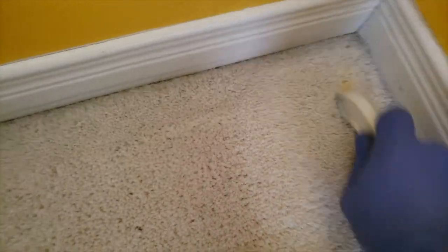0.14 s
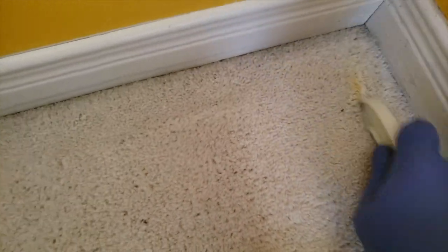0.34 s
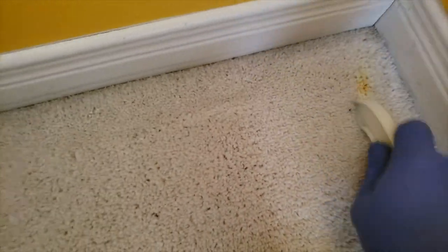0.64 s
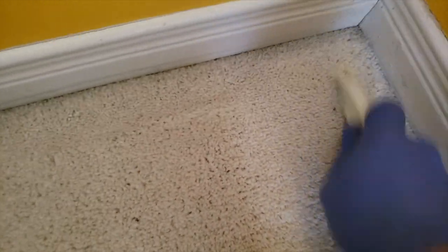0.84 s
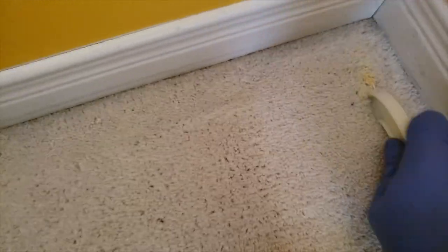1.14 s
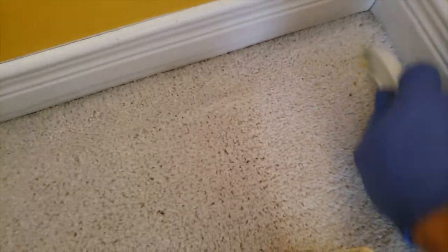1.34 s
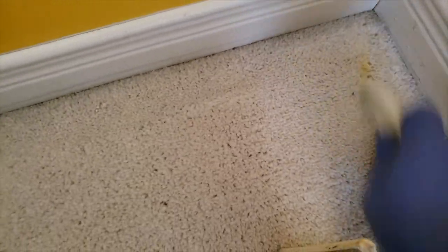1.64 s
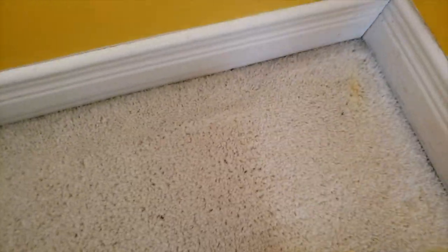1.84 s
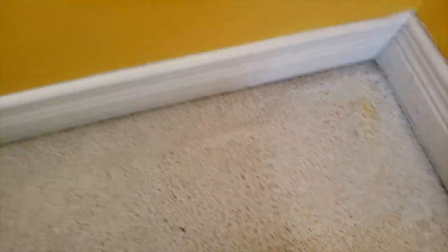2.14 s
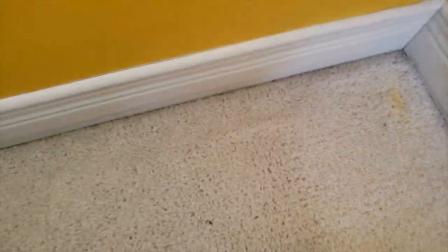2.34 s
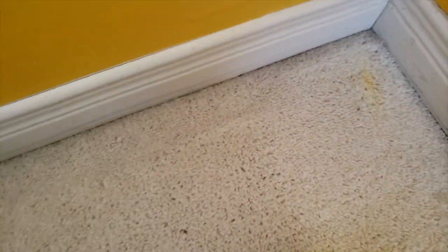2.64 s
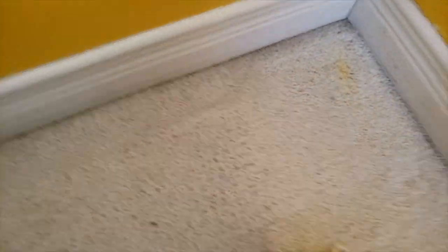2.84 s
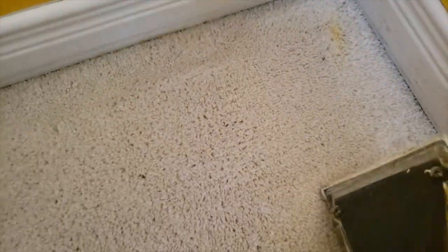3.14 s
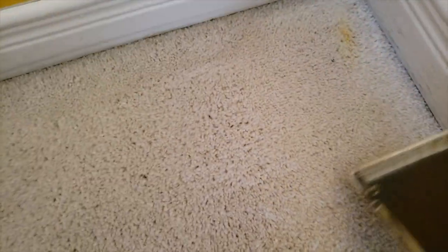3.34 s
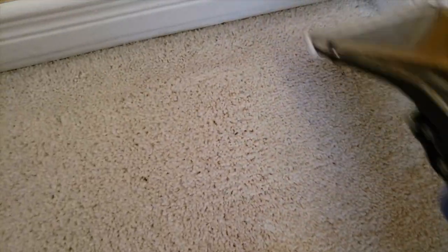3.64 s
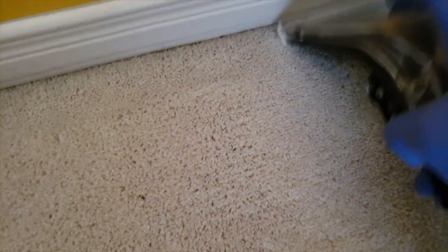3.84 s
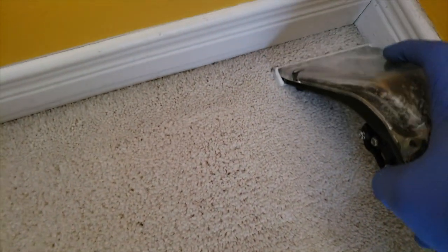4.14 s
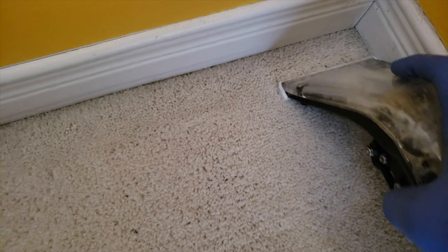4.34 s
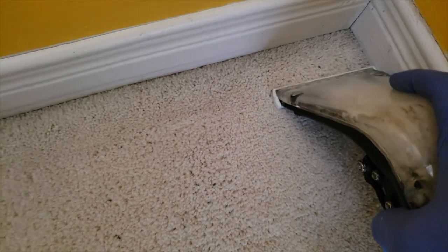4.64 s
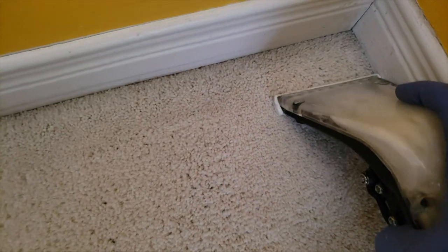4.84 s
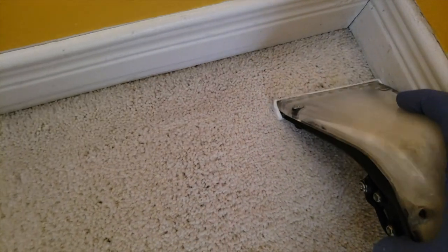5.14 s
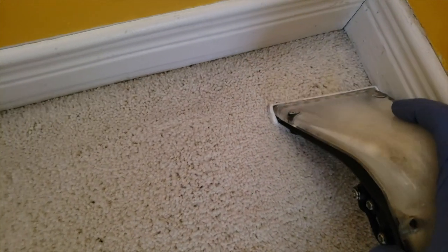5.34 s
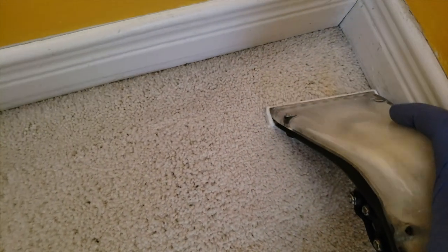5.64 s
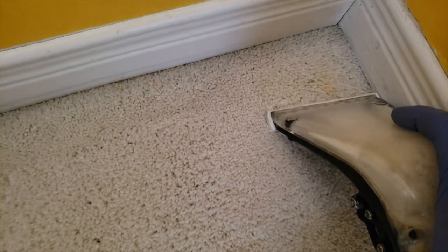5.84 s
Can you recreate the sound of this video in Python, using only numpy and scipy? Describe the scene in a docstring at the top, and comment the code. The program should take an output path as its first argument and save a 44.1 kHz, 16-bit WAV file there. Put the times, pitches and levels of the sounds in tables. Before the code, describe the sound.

Close hissing suction and steady machine hum, broken by a knock and thump as the nozzle seals on carpet, dips and grows again.

```python
"""A close suction tool hisses in open air over the room hum of a carpet extractor's motor and blower.
Turbulence at the slot excites the nozzle's resonances; the hiss swells with each stroke of a scrubbing
hand and changes colour as the tool is turned and lifted. Swung over, the tool knocks on the skirting
board and seals on the carpet with a thump. The hiss drops at the seal, then the whole sound gradually
swells back."""
import sys
import numpy as np
from scipy import signal
from scipy.fft import rfft, irfft
from scipy.io import wavfile
from scipy.ndimage import uniform_filter1d

SR = 44100
rng = np.random.default_rng(int(sys.argv[2]) if len(sys.argv) > 2 else 0)


def to_wav(s):
    """Save 16-bit WAV."""
    ch = np.atleast_2d(s).T  # columns
    pcm = np.round(np.clip(ch, -1, 1) * 32767)  # PCM
    wavfile.write(sys.argv[1], SR, pcm.astype(np.int16))


N = 264600
TIME = np.arange(N) / SR
WINDOW = dict(nperseg=512, noverlap=384)
HZ, FRAMES, _ = signal.stft(np.zeros(N), SR, **WINDOW)
SEAL_S = 3.853  # the slot meets the carpet

# The whole sound swells back after the seal. Each row: time in seconds, relative level in dB.
LEVEL_RECOVERY = [(3.9, -6.3), (4.3, -5.5), (4.53, -3.1), (4.9, -2.5), (5.15, 1.4), (5.4, 1.7), (5.75, 3.5),
                  (6, 3.5)]


def amp(db):
    """Amplitude ratio of a level in decibels."""
    return 10 ** (np.asarray(db) / 20)


def unit_rms(x):
    """Normalisation to rms 1."""
    return x / np.sqrt(np.mean(x ** 2) + 1e-20)


def follow(rows, t):
    """Linear interpolation of each column at the times t."""
    s, *columns = np.transpose(rows)
    return np.array([np.interp(t, s, c) for c in columns])


def colour(rows, hz):
    """Interpolation of each column over log frequency."""
    f, *columns = np.transpose(rows)
    return np.array([np.interp(np.log(hz + 1), np.log(f), c) for c in columns])


def drift(t, rate_hz):
    """Superposed slow sines of random phase, up to rate_hz: a wander of rms 1."""
    rates = rate_hz * np.geomspace(.1, 1, 20)[:, None]
    return unit_rms(np.sin(2 * np.pi * (rates * t + rng.random(rates.shape))).sum(0))


def patches(shape, bins, frames):
    """Noise smoothed over frequency and time into blotches of rms 1."""
    field = uniform_filter1d(rng.standard_normal(shape), size=bins, axis=-2)
    return unit_rms(uniform_filter1d(field, size=frames, axis=-1))


def white():
    """Short-time spectra of white noise."""
    return signal.stft(rng.standard_normal(N) * np.sqrt(SR / 2), SR, **WINDOW)[2]


def noise(spectrum):
    """Stationary noise from rows of frequency in Hz and spectral density in dB per Hz."""
    gain = amp(colour(spectrum, np.fft.rfftfreq(N, 1 / SR))[0])
    return irfft(rfft(rng.standard_normal(N)) * gain, N) * np.sqrt(SR / 2)


def tone(turns):
    """A sinusoid of rms 1 and random phase."""
    return np.sqrt(2) * np.sin(2 * np.pi * (turns + rng.random()))


def bump(centre_hz, width_hz):
    """A Gaussian of height 1 over frequency."""
    return np.exp(-((HZ[:, None] - centre_hz) / width_hz) ** 2)


def swell(s, half_s):
    """A Gaussian of height 1 over time."""
    return np.exp(-((FRAMES - s) / half_s) ** 2)


def burst(start_s, end_s, db, rise_db_per_s, fall_db_per_s):
    """An envelope: exponential growth, a hold from start to end, exponential decay."""
    early_s, late_s = np.maximum(start_s - TIME, 0), np.maximum(TIME - end_s, 0)
    return amp(db - rise_db_per_s * early_s - fall_db_per_s * late_s)


def nozzle(air, modes, flow_db, wander_db, patchy_db, flutter_db, alike, low_hz, near_hz,
           rings_db, extra_db):
    """Turbulence radiates broad noise and excites resonances, partly coherent at two microphones."""
    hz = HZ[:, None]
    power = amp(colour(air, hz)) ** 2 * np.ones(len(FRAMES))
    # long waves reach both microphones alike
    cross_power = np.sqrt(power.prod(0)) / (1 + (hz / near_hz) ** 4) + 0j
    for centre, width, left_db, right_db, lead in modes:
        detune = (hz - centre * (1 + 0.008 * drift(FRAMES, 9))) / width
        ring = amp(rings_db + wander_db * drift(FRAMES, 16)) / (1 + 2 * detune ** 2)
        power += (amp([left_db, right_db])[:, None, None] * ring) ** 2
        cross_power += alike * amp(left_db) * amp(right_db) * ring ** 2 * np.exp(1j * lead)
    coherence = cross_power / np.sqrt(power.prod(0))
    left = white()
    right = coherence.conj() * left + np.sqrt(np.maximum(1 - abs(coherence) ** 2, 0)) * white()
    # cavity, slot and jet rule the low, middle and high bands
    shares = colour([(3300, 1, 0, 0), (4300, 0, 1, 0), (8000, 0, 1, 0), (10500, 0, 0, 1)], HZ)
    eddies = patches(left.shape, bins=9, frames=16)
    level_db = shares.T @ flow_db + extra_db + patchy_db * eddies + flutter_db * drift(FRAMES, 55)
    low_cut = hz ** 3 / (hz ** 3 + low_hz ** 3)
    spectra = np.array([left, right]) * np.sqrt(power) * amp(level_db) * low_cut
    return signal.istft(spectra, SR, **WINDOW)[1][:, :N]


def board_echo(near, strength, wobble):
    """Comb filtering, in dB: the skirting board's echo interferes, sooner as the tool nears it."""
    far_s, near_s = 0.001223, 0.00037
    delay = near_s + (far_s - near_s) * np.exp(-10.8 * near)
    delay = delay * (1 + wobble * np.array([drift(FRAMES, 2.8), drift(FRAMES, 2.8)]))  # the hand moves
    ripple = np.cos(2 * np.pi * HZ[:, None] * delay[:, None])
    return 10 * np.log10(1 + np.clip(2 * strength, 0, .9) * ripple * (HZ[:, None] > 1000))


def turning(tilt_db):
    """Directivity, in dB: the turning tool beams different resonances at each microphone."""
    # The cavity's strongest ring. Each row: time in seconds, frequency in Hz, relative prominence in dB.
    strongest_ring = [(0, 2800, 1.5), (0.8, 2740, 3.5), (1.3, 2970, -0.5), (1.85, 3040, 7.5),
                      (2.5, 3150, 8.5), (2.98, 2980, 1), (3.1, 2800, 10.5), (3.34, 2680, 6.5),
                      (3.47, 3250, 15), (3.7, 2970, -5)]
    # Resonances flare as the slot swings past.
    # Each row: time and half length in seconds, frequency in Hz, boost in dB.
    flares = [(2.655, 0.13, 7700, 4), (2.89, 0.073, 6200, 3.5), (3.057, 0.03, 2400, 5),
              (3.384, 0.035, 5070, 13)]
    ring_shares, tilt_shares = (1.06, 0.3), (0.52, 1.1)  # left, right
    ring_hz, prominence_db = follow(strongest_ring, FRAMES)
    peak = bump(ring_hz, 580) - 0.44 * bump(ring_hz, 1400)
    ring_db = np.multiply.outer(ring_shares, prominence_db * peak)
    slot_db = np.multiply.outer(tilt_shares, tilt_db * (bump(4190, 280) - bump(6340, 410)))
    # the lifted tool crosses in front and turns its low cavity ring to the right
    crossing_db = np.multiply.outer([0, 1], 12 * swell(3.22, 0.18) * bump(1680, 380))
    flare_db = sum(db * swell(s, half_s) * bump(hz, 330) for s, half_s, hz, db in flares)
    return ring_db + slot_db + crossing_db + flare_db


def open_hiss(scatter_db):
    """Flow noise of the free slot: it swells with each stroke and is choked near the carpet."""
    # Broad air noise. Each row: frequency in Hz, left and right relative density in dB.
    air = [(790, -73.5, -73), (866, -66, -69), (1300, -89, -89), (2100, -77, -76.5), (4000, -68, -71),
           (5980, -66, -60), (7000, -69, -69.5), (8050, -77, -65), (9000, -70.5, -66), (10060, -66.5, -63),
           (10840, -61, -61), (13700, -60.5, -58.5), (15800, -65, -60)]
    # Nozzle resonances. Each row: centre and width in Hz, left and right relative peak in dB,
    # left phase lead in radians.
    modes = [(1250, 194, -62.5, -74, 5), (1653, 320, -58.5, -72.5, -1.5), (2340, 230, -60, -65, -1.5),
             (2690, 222, -52.5, -66.5, -2.5), (3060, 200, -59.5, -65, 4.5), (3503, 256, -53.5, -61, 1.85),
             (4280, 290, -59.5, -57, 1.6), (5300, 160, -61.5, -58, 2), (6400, 350, -59, -66, -0.5),
             (7770, 760, -71, -61.5, 1.4)]
    # The tool is turned, then lifted.
    # Each row: time in seconds, hiss in dB, relative tilt from the slot's high ring to its low in dB.
    aim = [(0, -0.8, -5.5), (1.55, 0, -3.5), (1.9, 0.5, -0.5), (2.6, 1.5, 2.5), (2.89, 1.5, -5),
           (2.99, 1.4, -2), (3.15, 0.8, 5.5), (3.35, -0.1, 2), (3.6, 0.5, 3.5)]
    # The descent into the corner. Each row: time in seconds, nearness from 0 to 1.
    approach = [(2.9, 0.01), (3.3, 0), (3.55, 0.11), (3.7, 0.37), (3.78, 0.41), (3.85, 0.66)]
    # Cavity, slot and jet. Each row: gain in free air in dB, choking at full nearness in dB.
    bands = [(0, -1), (0.51, -4), (-0.26, -14.5)]
    # Scrubbing strokes. Each row: time and half length in seconds, cavity and jet swell in dB.
    strokes = [(0.07, 0.069, 4.5, 1.5), (0.363, 0.11, 0.5, 3.5), (0.62, 0.095, 4.5, 1),
               (0.9, 0.11, 3.5, 1.8), (1.137, 0.06, 1.3, 3.8), (1.4, 0.06, 3, 2.5), (1.66, 0.067, 2.5, 1.5)]
    aim_db, tilt_db = follow(aim, FRAMES)
    near, = follow(approach, FRAMES)
    flow_db = np.array([free_db + aim_db + choke_db * near for free_db, choke_db in bands])
    for s, half_s, cavity_db, jet_db in strokes:
        flow_db += np.outer([cavity_db, 1.0, jet_db], swell(s, half_s))
        tilt_db += 5 * swell(s - 0.065, 0.067)  # between strokes the slot rocks toward its low ring
    tilt_db += 0.76 * drift(FRAMES, 9)
    flow_db += np.array([0.57 * drift(FRAMES, 8) for _ in bands])  # the held tool trembles
    # the nearing carpet speeds the air in the gap and damps the rings
    sizzle_db = 8 * near * (bump(14200, 2300) - 0.94 * bump(9000, 2000))
    damping_db = -0.04 - 4.5 * near
    colour_db = turning(tilt_db) + scatter_db + sizzle_db + board_echo(near, strength=0.19, wobble=0.074)
    lifted = np.clip((FRAMES - 2.92) / 0.12 + .5, 0, 1)
    away_db = -3 * lifted * bump(5900, 4100)  # the slot points away and its high rings fade
    return nozzle(air, modes, flow_db, wander_db=0.58, patchy_db=0.98, flutter_db=0.13, alike=0.83,
                  low_hz=830, near_hz=565, rings_db=damping_db + away_db, extra_db=colour_db)


def suction(turns):
    """The hiss passes from open to sealed; amplitude modulation throbs its treble twice a shaft turn."""
    # short waves scatter off the moving hand, differently toward each microphone
    blotches = patches((2, len(HZ), len(FRAMES)), bins=4, frames=80)
    scatter_db = 1.5 * blotches * np.minimum(HZ[:, None] / 5000, 1)
    sealed = np.clip((TIME - SEAL_S) / 0.02 + .5, 0, 1)
    air = amp(-0.53) * open_hiss(scatter_db) * (1 - sealed) + amp(-0.2) * pile_hiss(scatter_db) * sealed
    treble = signal.sosfiltfilt(signal.butter(2, 3500, "high", fs=SR, output="sos"), air)
    return air + .11 * treble * np.cos(2 * np.pi * 2 * turns)


def motor_hum(turns, load):
    """Harmonics of the shaft's rotation; each wavers, less so under load."""
    # Each row: multiple of the shaft speed, relative level in dB with the slot open and with it sealed.
    orders = [(2, -48, -44.5), (3, -67, -63), (4, -56.5, -52.5), (5, -50.5, -46.5), (6, -67.5, -60.5),
              (8, -65, -58.5), (9, -57, -54), (10, -57, -61), (11, -61, -56.5), (12, -72, -59.5),
              (14, -61, -61)]
    waver_db = np.interp(load, [0, 1], [1.8, 0.7])
    hum = np.zeros(N)
    for order, free_db, shut_db in orders:
        level_db = free_db + load * (shut_db - free_db) + waver_db * drift(TIME, 3.4)
        hum += amp(level_db) * tone(round(order) * turns)
    return hum


def blower_roar():
    """Low-passed noise of the blower in the room, largely coherent between left and right."""
    # Each row: frequency in Hz, relative density in dB.
    spectrum = [(20, -105), (45, -75), (75, -71), (150, -67.5), (210, -73.5), (320, -68), (400, -70),
                (530, -67.5), (650, -72.5)]
    roar = noise(spectrum) + 0.32 * np.array([noise(spectrum), noise(spectrum)])
    return signal.sosfilt(signal.butter(12, 660, fs=SR, output="sos"), roar)


def whine():
    """A thin tone with slight random modulation of frequency and amplitude."""
    pitch_hz = 1807 * (1 + .002 * drift(TIME, 9))
    return tone(np.cumsum(pitch_hz) / SR) * amp(-54 + 2.5 * drift(TIME, 7))


def machine(turns):
    """Sealing loads the machine and the whine stops; hum and roar grow as the overall level recovers."""
    # Hum, then roar. Each row: gain in dB with the slot open and with it sealed, share of the recovery.
    load_gains = [(-1, 0.5, 0.38), (-3, -3.4, 0.77)]
    load = np.clip((TIME - SEAL_S) / 0.1, 0, 1)
    recovery_db, = follow(LEVEL_RECOVERY, TIME)
    hum_db, roar_db = [(1 - load) * free_db + load * (shut_db + share * recovery_db)
                       for free_db, shut_db, share in load_gains]
    body = motor_hum(turns, load) * amp(hum_db) + blower_roar() * amp(roar_db) + hose_hoot(recovery_db)
    return body * amp([[.95], [-.95]]) + whine() * (1 - load) * amp([[3], [-5]])


def handling():
    """Flow and friction noise: the swung hose rumbles, air rushes at the lip, the lip scuffs the pile."""
    rumble = noise([(25, -33), (60, -24), (83, 6), (115, -14), (150, 2), (220, -18), (500, -12.5),
                    (2000, -70)])
    rub = noise([(100, -34), (300, 2), (400, -1), (520, 6.5), (650, 3.5), (880, 2.0), (1400, -3.0),
                 (2200, -12), (6000, -21)])
    swing = burst(3.63, 3.82, db=-35.5, rise_db_per_s=94, fall_db_per_s=278)
    rush = burst(3.65, 3.84, db=-37, rise_db_per_s=31, fall_db_per_s=555)
    scuff = burst(3.805, 3.842, db=-35, rise_db_per_s=900, fall_db_per_s=602)
    return (unit_rms(rumble) * swing + unit_rms(rub) * (rush + scuff)) * amp([[1.1], [-1.1]])


def knocks():
    """Each impact excites the plastic shell's damped modes and a slower-rising thump of the floor."""
    # Each row: start in seconds, click and thump gain in dB, thump pitch in Hz, its t60 in seconds.
    blows = [(3.7473, -18.5, -43, 150, 0.025), (3.7545, -13.5, -9.5, 94, 0.052),
             (3.798, -18.5, -40, 130, 0.046), (3.809, -30, -23, 125, 0.046), (3.848, -43, -21.5, 58, 0.063)]
    # Each row: frequency in Hz, relative level in dB, t60 in seconds.
    shell_modes = [(270, -17, 0.048), (530, -13.5, 0.05), (940, -2.5, 0.011), (1280, 1.5, 0.0047),
                   (1660, -17, 0.011), (2350, -11, 0.013), (4000, -14, 0.0082)]
    t = np.arange(SR // 4) / SR
    click = -sum(amp(db - 60 * t / t60) * np.sin(2 * np.pi * hz * t) for hz, db, t60 in shell_modes)
    rise = 1 - np.exp(-t / 0.0084)
    out = np.zeros(N)
    for s, click_db, thump_db, thump_hz, thump_t60 in blows:
        thump = 2 * rise * amp(-60 * t / thump_t60) * np.sin(2 * np.pi * thump_hz * t)
        out[round(s * SR):][:len(t)] += amp(click_db) * click + amp(thump_db) * thump
    return out * amp([[1.5], [-1.5]])


def pile_hiss(scatter_db):
    """Flow noise of the sealed slot: it dips as suction grabs the pile, then gradually swells back."""
    # Broad air noise. Each row: frequency in Hz, left and right relative density in dB.
    air = [(403, -73, -76), (690, -70, -77), (800.0, -66, -66), (1350, -66.5, -74.5), (2050.0, -90, -73.0),
           (4000.0, -76, -72.5), (6300, -70.5, -70), (7400, -74, -73), (8350, -82, -74.5),
           (9400, -82.5, -78.5), (10600, -73, -72.5), (12600.0, -68, -71.5), (14700.0, -70, -65.5),
           (15600.0, -69, -75)]
    # Nozzle resonances. Each row: centre and width in Hz, left and right relative peak in dB,
    # left phase lead in radians.
    modes = [(507, 48, -60.5, -61.5, -0.5), (736, 90, -60, -70, 0.3), (1655, 410, -64.5, -82.5, -2),
             (2435, 270, -63.5, -82, 0.5), (2810, 400, -64.5, -83, -1.5), (3570, 640, -66, -79, -2),
             (4420, 480, -78, -75, 0.5)]
    # Cavity, slot and jet. Each row: gain in dB, share of the recovery.
    bands = [(0, 0.58), (-0.06, 1.0), (0.15, 0.94)]
    recovery_db, = follow(LEVEL_RECOVERY, FRAMES)
    grab_db = np.outer([-5, -8, -13], swell(SEAL_S, 0.032))
    bands_db = np.array([db + share * recovery_db for db, share in bands]) + grab_db
    settle_db = -6 * swell(SEAL_S, 0.16) * bump(700, 450)  # the low roar returns last
    return nozzle(air, modes, bands_db, wander_db=0.8, patchy_db=0.65, flutter_db=0.43, alike=1.0,
                  low_hz=480, near_hz=1240, rings_db=0.1, extra_db=0.61 * scatter_db + settle_db)


def hose_hoot(recovery_db):
    """A faint pure tone of the loaded hose, gliding up in pitch as the level recovers."""
    pitch_hz = 320 + 2.5 * recovery_db
    envelope = burst(4.78, 5.15, db=-50.5, rise_db_per_s=60, fall_db_per_s=25.5)
    return tone(np.cumsum(pitch_hz) / SR) * envelope


def scene():
    """Superposition of the sources; one motor drives both the hum and the throb of the air."""
    shaft_hz = 29.87 * (1 + 0.001 * drift(TIME, 2.13))
    turns = np.cumsum(shaft_hz) / SR
    return suction(turns) + machine(turns) + handling() + knocks()


def record(dry):
    """A steep low-pass filter limits the bandwidth."""
    low_pass = signal.firwin(1023, 15780, window=("kaiser", 9), fs=SR)
    return signal.oaconvolve(dry, low_pass[None], "same")


dry = scene()
out = record(dry)
to_wav(out)
```